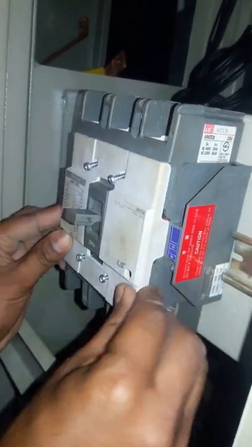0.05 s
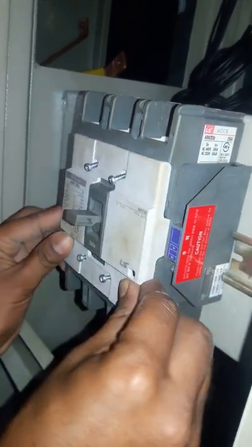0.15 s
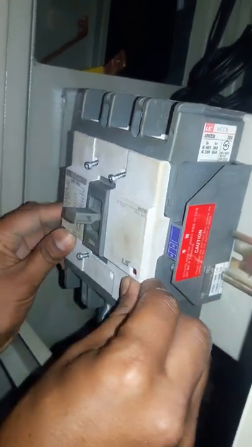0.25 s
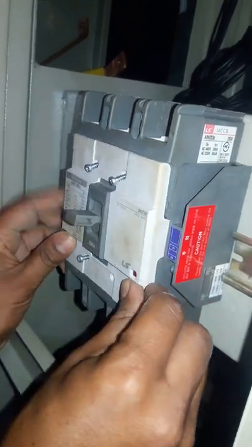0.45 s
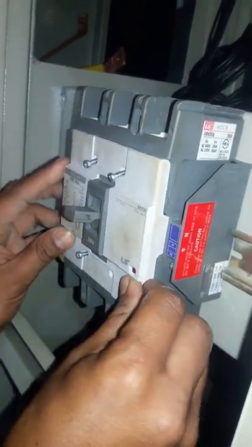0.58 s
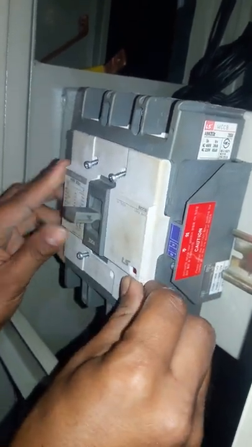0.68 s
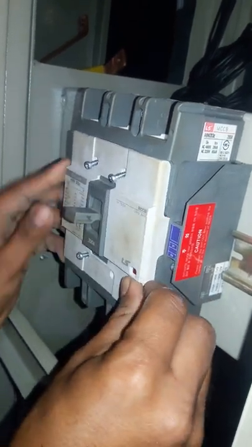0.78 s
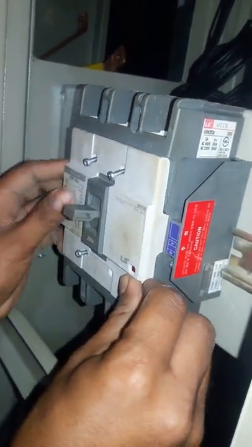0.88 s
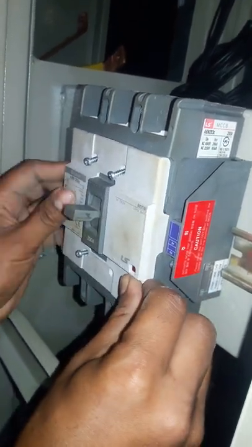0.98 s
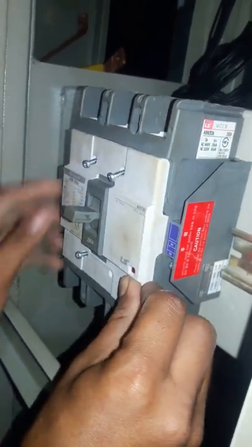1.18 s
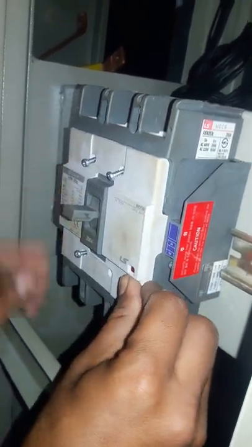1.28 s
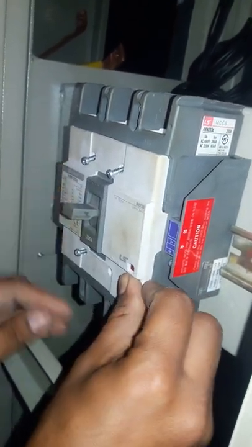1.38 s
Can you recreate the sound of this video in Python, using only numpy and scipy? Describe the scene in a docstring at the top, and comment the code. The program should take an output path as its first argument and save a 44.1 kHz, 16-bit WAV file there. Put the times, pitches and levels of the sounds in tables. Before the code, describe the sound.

Close by, a plastic cover knocks twice onto a circuit breaker, then a quick run of sharp clicks, soft finger bumps and a last small rattle follow. The steel cabinet and the quiet room ring briefly after each contact.

```python
"""After a faint finger tap, a circuit breaker's plastic cover is pressed home close by in a steel cabinet:
two hollow knocks, at 0.2 s and 0.32 s. From 0.42 s small hard parts snap and bounce on it in bright
clicks while fingers bump the case. A few weaker clicks follow, then a last rattle at 1.13-1.2 s.
The cabinet's panels and the room ring on after the contacts, over a low room tone and a faint hum."""
import sys
import numpy as np
from scipy import signal
from scipy.fft import rfft, irfft, next_fast_len
from scipy.io import wavfile
from scipy.ndimage import uniform_filter1d

SR = 44100
rng = np.random.default_rng(int(sys.argv[2]) if len(sys.argv) > 2 else 0)


def inscribe(sig):
    """Save sig as 16-bit PCM at rate SR to the path in sys.argv[1].

    A 1-D sig is mono; a 2-D sig holds one channel per row.
    Samples are clipped to [-1, 1] before scaling.
    """
    pcm = np.round(np.clip(np.atleast_2d(sig).T, -1, 1) * 32767)
    wavfile.write(sys.argv[1], SR, pcm.astype(np.int16))


N = 63945
T = np.arange(N) / SR

# cover contacts: start_s, level_db, place (0 edge, 1 seat), crack_db, catch_db, room_db
KNOCKS = [(.2030, -18, 0, -9, -17, -12.5), (0.3173, -10.5, 0.92, -8.5, -7.5, -9),
          (0.3262, -22.5, 0.3, 6.5, -6.5, -6)]
# plastic case modes: freq_hz, edge_db, seat_db, t60_s
CASE_MODES = [(137, -29, -22, .4), (199.2, -10, -33, 0.23), (260.5, -7.5, -10.5, 0.066),
              (406, -16, -12.5, 0.025), (491, -33.5, -33, 0.21), (618, -37, 0, 0.061),
              (667, -4, -23.5, 0.14), (722, 7, 3, 0.031), (846, -10.5, -10, 0.14), (961, -0.5, 3.5, 0.044),
              (1046, -11.5, -3.5, 0.048), (1505, -9.5, -4, 0.065), (1517, -1, 0.5, 0.034)]
# crack of the plastic: freq_hz, gain_db
CRACK_SPECTRUM = [(40, -34), (150, -13), (600, -15.5), (1600, 3.5), (2100, -9.5), (2800, -1.5),
                  (3500, -12.5), (4200, -10.5), (4700, -23.5), (6400, -11.5), (7800, -38.5), (9000, -50),
                  (16000, -54)]
# bright snap of the catch: freq_hz, gain_db
CATCH_SPECTRUM = [(1000, -40), (4700, -35), (5300, 2), (5700, -18), (6100, 2), (6500, -1), (7100, -21),
                  (7900, -37.5), (9000, -29.5), (16000, -29)]
# thud sent into the cabinet: freq_hz, gain_db
THUD_SPECTRUM = [(40, -44.5), (110, 2), (260, -1.5), (380, -6.5), (600, 5.5), (1000, -5), (1500, 1.5),
                 (2100, -12.5), (2900, -15.5), (3600, -21), (6400, -19.5), (7700, -53), (9000, -55.5),
                 (16000, -55.5)]

# hard contacts: start_s, level_db, place (0 body, 1 handle), treble_db, ring_db, panel_db, room_db
CLICKS = [(.107, -74, 0, -14, -33, 3, -14), (0.4223, -26, 0, 7, -8, -26, -5),
          (0.4266, -12.5, 0, 2, -0.5, -5, -2), (0.5051, -21, 0.13, 1.5, -11, -13, -19),
          (.514, -17, 0.68, 2, -1, -1, -4), (.5205, -24, 0, 2.5, 7, -4, -5.5),
          (0.5538, -19.5, 0.27, 0.5, 2, -4.5, -6.5), (0.5608, -29.5, 0, 3, 14, -7, -4),
          (0.5778, -25, 0, 0.5, -10, -2, -13), (0.5829, -29.5, 0.32, -0.5, -13, -18, 1.5),
          (0.733, -46, 0.44, -13, -8, 6, 3.5), (.911, -50.5, 0.53, -17, -7.5, 15, 1.5),
          (0.9916, -37.5, 0.37, -16, -11, 5, -5), (1.0586, -27.5, 1, -5, -11, -4.5, -5),
          (1.1297, -38, 0.89, -7, -6, -11, 3), (1.1366, -34.5, 0.31, -2, 6, 4.5, -0.5),
          (1.148, -40, 0.77, -2, -7, -0.5, -1), (1.1591, -29.5, 1, -1, -2, -2, -7),
          (1.166, -35.5, 0.58, 2.5, -7, -3, -21), (1.175, -28, 0.9, -1.5, -14, -3.5, -4.5),
          (1.201, -38, 1, -12, -19, 2, -9)]
# first instant of a contact: freq_hz, gain_db
TICK_SPECTRUM = [(300, -30), (2500, -12.5), (4500, -3.5), (6200, 0.5), (7300, -10), (7900, -30),
                 (8600, -13), (14200, -13), (16000, -14.5)]
# broad snap resonances: freq_hz, level_db, t60_s
SNAP_MODES = [(5710, 3, 0.029), (6170, 0, 0.039), (6470, -4, 0.066)]
# dense snap overtones: freq_hz, gain_db
CLATTER_SPECTRUM = [(30, -62.5), (100, -12.5), (250, -15), (900, -25.5), (1500, -12), (2400, -16),
                    (3200, -14), (3700, -9.5), (5000, -2.5), (6100, 0.5), (6800, -4.5), (7400, -12.5),
                    (7900, -31.5), (9000, -67)]
# snap treble: freq_hz, gain_db
TREBLE_SPECTRUM = [(6500, -50), (7900, -10.5), (8400, -1), (9800, -5), (10400, -9), (10950, -0.5),
                   (11900, -10.5), (14100, -4.5), (15300, -2), (16200, -25)]
# small-part modes: freq_hz, body_db, handle_db, t60_s
PART_MODES = [(4090, -33, -30, .22), (4425, -32, -40, .25), (4471, -30, -37, .36), (4604, -31, -35, .25),
              (4850, -27, -40, .13), (5184, -22, -36, .24), (5512, -34, -22, .14), (5638, -18, -31, .18),
              (5714, -23, -32, .2), (5812, -24, -22, .2), (6022, -23, -24, .12), (6213, -19, -28, .17),
              (6500, -25, -22, .16), (6690, -23, -20, .2)]
# cabinet panel resonances: freq_hz, body_db, handle_db, peak_s
PANEL_MODES = [(1398, -10, -25.5, 0.019), (1586, -30, -22, 0.017), (1664, -28, -24.5, 0.028),
               (1794, -24, -14.5, 0.023), (1879, -15.5, -20, .014), (2383, -25, -37, 0.0064),
               (2917, -18.5, -16.5, 0.016), (2964, -10, -14.5, 0.0058), (3078, -20, -16.5, .007),
               (3193, -12.5, -36, .014)]
# thin-metal pings: start_s, pitch_hz, level_db, t60_s
PINGS = [(.5535, 5667, -39, .55), (1.1585, 5208, -30, .23), (1.18, 1175, -57, 2.5)]

# finger bumps: start_s, level_db
BUMPS = [(.132, -49), (.45, -45), (.54, -44), (.992, -48), (1.005, -42), (1.258, -42)]
# damped case response to a finger: freq_hz, level_db, t60_s
BUMP_MODES = [(80, 1, .055), (135, 4, .05), (200, 0, .035), (270, 1, .04)]
# fingernail tap: freq_hz, gain_db
TAP_SPECTRUM = [(300, -15), (900, -21), (1450, 16), (2200, -13), (6000, -19), (9000, -53)]
# finger drag: start_s, pitch_hz, level_db, peak_s
DRAG = (1.075, 265, -52, .04)

# room decay: freq_hz, t60_s
ROOM_DECAY = [(120, 1), (500, 0.64), (1500, 0.69), (3000, 0.72), (6000, 0.63), (10000, 0.54), (16000, 0.28)]
# reverberation colour: freq_hz, gain_db
REVERB_SPECTRUM = [(100, 5.5), (600, -0.5), (1500, 3.5), (3000, 4), (6000, -12.5), (10000, -5.5),
                   (16000, -8)]
# room tone: freq_hz, gain_db
ROOM_TONE_SPECTRUM = [(15, -50), (25, -24), (43, -9), (114, -4.5), (489, -6), (560, -10), (641, -6.5),
                      (775, -11), (840, -8.5), (1100, -9.5), (1190, -7.5), (2610, -20), (6210, -39),
                      (8140, -49), (16000, -46)]
# steady hum: pitch_hz, level_db
HUM_TONES = [(104, -62), (256, -63.5), (828, -64.5), (1464, -64.5)]


def cover_knocks(rise_s=0.0012, knock_low_hz=132, wall_delay_s=0.04):
    """Each knock cracks and rings the hollow case, its deep bass held back; a far wall echoes it."""
    out = np.zeros(N)
    bass_cut = signal.butter(2, knock_low_hz, "high", fs=SR, output="sos")
    for start_s, level_db, place, crack_db, catch_db, room_db in KNOCKS:
        body = ring_in_phase(struck_at(CASE_MODES, place))
        crack = amp(crack_db) * noise(CRACK_SPECTRUM) * fade(t60_s=0.052)
        catch = amp(catch_db + 2) * noise(CATCH_SPECTRUM) * fade(t60_s=0.019)
        knock = signal.sosfilt(bass_cut, (body + crack + catch) * rise(rise_s))
        wall_echo = amp(-15.5) * at(wall_delay_s, noise(THUD_SPECTRUM) * swell(peak_s=0.023))
        thud = noise(THUD_SPECTRUM) * fade(t60_s=0.03)
        out += amp(level_db) * at(start_s, knock + amp(room_db) * (reverb(thud) + wall_echo))
    return out


def part_clicks(rise_s=0.0012):
    """Hard contacts: a tick, a snap near 6 kHz, the parts' thin ring, the panels' slower answer."""
    out = np.zeros(N)
    for start_s, level_db, place, treble_db, ring_db, panel_db, room_db in CLICKS:
        overtones = amp(1.5) * noise(CLATTER_SPECTRUM)
        treble = amp(treble_db - 14) * noise(TREBLE_SPECTRUM)
        clatter = (overtones + treble) * fade(t60_s=0.057)
        snap = (clatter + ring_scattered(SNAP_MODES, scatter_db=1.5)) * rise(rise_s)
        parts = amp(ring_db) * ring_scattered(struck_at(PART_MODES, place), scatter_db=4) * rise(rise_s)
        panels = amp(panel_db) * cabinet_panels(place)
        tick = amp(treble_db - 10.5) * noise(TICK_SPECTRUM) * fade(t60_s=0.0056)
        room = amp(room_db) * reverb(snap + amp(-8.5) * panels)
        out += amp(level_db) * at(start_s, tick + snap + parts + panels + room)
    return out


def cabinet_panels(place):
    """Steel panel resonances swell after a click."""
    return sum(amp(db) * swell(peak_s) * cluster(hz) for hz, db, peak_s in struck_at(PANEL_MODES, place))


def metal_pings(rise_s=0.001):
    """Single tones of thin metal outlast the contact."""
    return sum(at(start_s, ring_in_phase([mode]) * rise(rise_s)) for start_s, *mode in PINGS)


def fingers(bump_rise_s=0.0037, tap_start_s=0.1068):
    """Dull bumps, one light nail tap and one short drag on the case."""
    bump = ring_in_phase(BUMP_MODES) * rise(bump_rise_s)
    bumps = sum(amp(level_db) * at(start_s, bump) for start_s, level_db in BUMPS)
    tap = amp(-44) * at(tap_start_s, noise(TAP_SPECTRUM) * fade(t60_s=0.023))
    start_s, pitch_hz, level_db, peak_s = DRAG
    drag = at(start_s, amp(level_db) * swell(peak_s) * tone(pitch_hz))
    return bumps + tap + drag


def reverb(x, early_db=7.5, early_t60_s=0.2, rise_s=0.011):
    """Dense early echoes of the cabinet, then the tail of the room."""
    hz, t, noise_stft = signal.stft(rng.standard_normal(SR), SR, nperseg=256)
    decay = fade(along(ROOM_DECAY, hz)[:, None], t) + amp(early_db) * fade(early_t60_s, t)
    colour = amp(along(REVERB_SPECTRUM, hz))[:, None]
    response = signal.istft(noise_stft * decay * colour, SR, nperseg=256)[1][:SR]
    response *= rise(rise_s, T[:SR])
    return signal.fftconvolve(x, response / np.linalg.norm(response))[:N]


def room_tone(noise_db=-54):
    """Low steady noise and a faint hum."""
    return amp(noise_db) * noise(ROOM_TONE_SPECTRUM) + sum(amp(db) * tone(hz) for hz, db in HUM_TONES)


def struck_at(modes, place):
    """The place of contact, 0 to 1, blends each mode's two levels."""
    return [(hz, db0 + place * (db1 - db0), time_s) for hz, db0, db1, time_s in modes]


def ring_in_phase(modes):
    """Damped modes, all starting at zero phase."""
    return sum(amp(db) * fade(t60_s) * np.sin(2 * np.pi * hz * T) for hz, db, t60_s in modes)


def ring_scattered(modes, scatter_db):
    """Damped modes of random strength and phase."""
    return sum(amp(db + scatter_db * rng.normal()) * fade(t60_s) * tone(hz) for hz, db, t60_s in modes)


def cluster(centre_hz, spread_hz=34.2):
    """Narrow cluster of modes, made as one tone of wandering pitch."""
    drift = uniform_filter1d(rng.standard_normal(N), size=256)
    pitch_hz = centre_hz + spread_hz * drift / drift.std()
    return np.sin(2 * np.pi * (np.cumsum(pitch_hz) / SR + rng.random()))


def tone(hz):
    """Sine of random phase."""
    return np.sin(2 * np.pi * (hz * T + rng.random()))


def noise(spectrum):
    """Coloured noise, rms 1."""
    size = next_fast_len(N + 8192)
    gain = amp(along(spectrum, np.fft.rfftfreq(size, 1 / SR)))
    x = irfft(rfft(rng.standard_normal(size)) * gain, size)[:N]
    return x / x.std()


def along(points, hz):
    """Interpolate on a log frequency axis."""
    points_hz, values = np.transpose(points)
    return np.interp(np.log(hz + 1), np.log(points_hz + 1), values)


def amp(db):
    """Decibels to gain."""
    return 10 ** (np.asarray(db) / 20)


def fade(t60_s, t=T):
    """Exponential decay, 60 dB in t60_s."""
    return np.exp(-np.log(1000) * t / t60_s)


def rise(rise_s, t=T):
    """Soft attack."""
    return 1 - np.exp(-t / rise_s)


def swell(peak_s):
    """Smooth hump, 1 at peak_s."""
    return (T / peak_s * np.exp(1 - T / peak_s)) ** 2


def at(start_s, x):
    """Delay x to start_s."""
    return np.pad(x, (round(start_s * SR), 0))[:N]


def scene():
    """All sources at one close microphone."""
    return (cover_knocks() + part_clicks() + metal_pings() + fingers() + room_tone())[None]


def record(dry, low_hz=56.6, top_hz=16000):
    """The microphone thins the deep bass; the recorder cuts above its band limit."""
    bass_cut = signal.butter(2, low_hz, "high", fs=SR, output="sos")
    band_limit = signal.ellip(10, 0.1, 80, top_hz, fs=SR, output="sos")
    return signal.sosfilt(band_limit, signal.sosfilt(bass_cut, dry))


dry = scene()
out = record(dry)
inscribe(out)
```